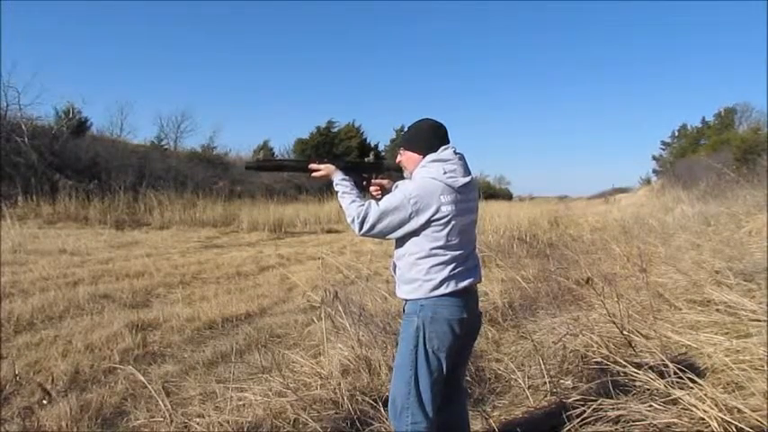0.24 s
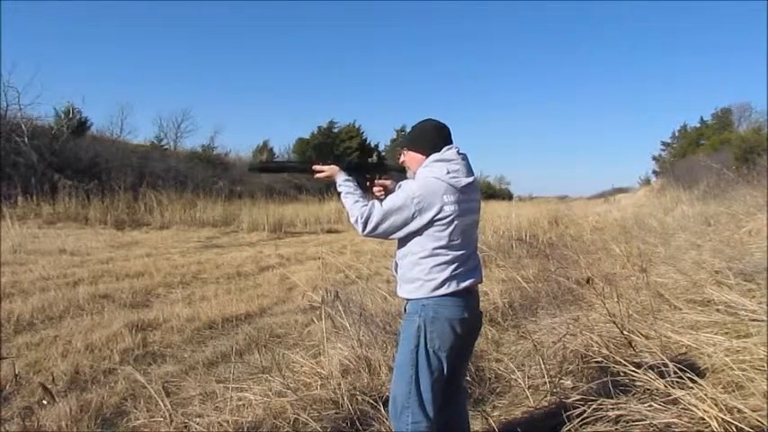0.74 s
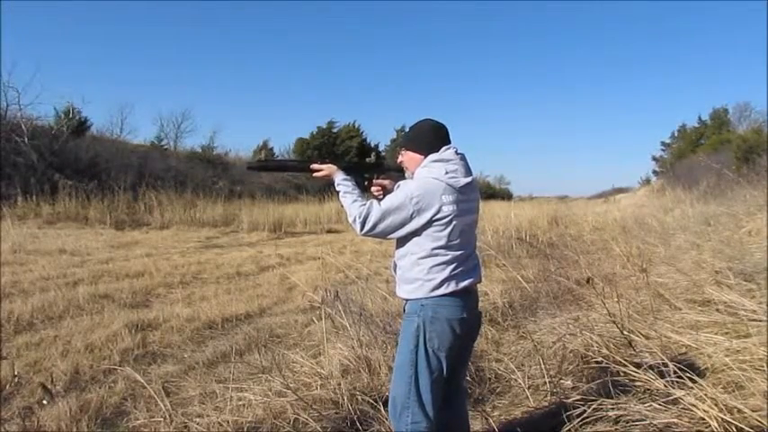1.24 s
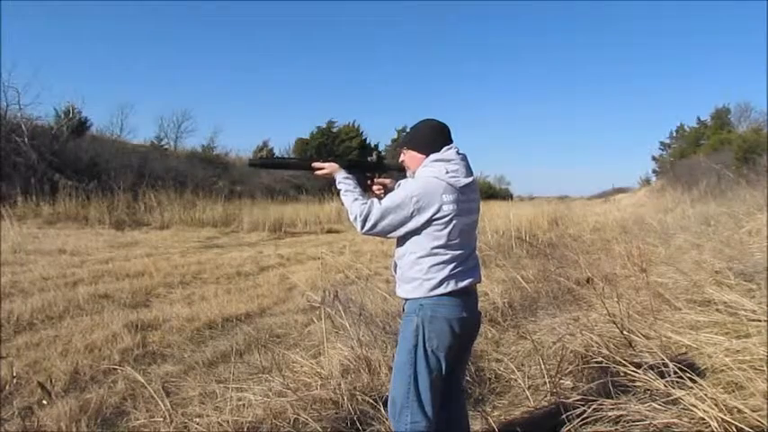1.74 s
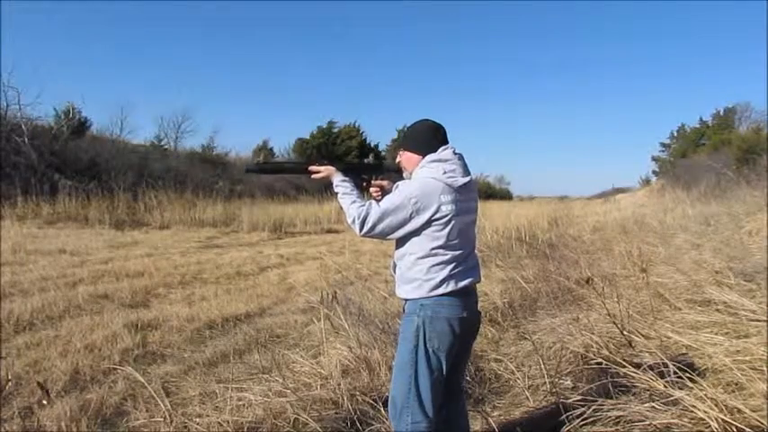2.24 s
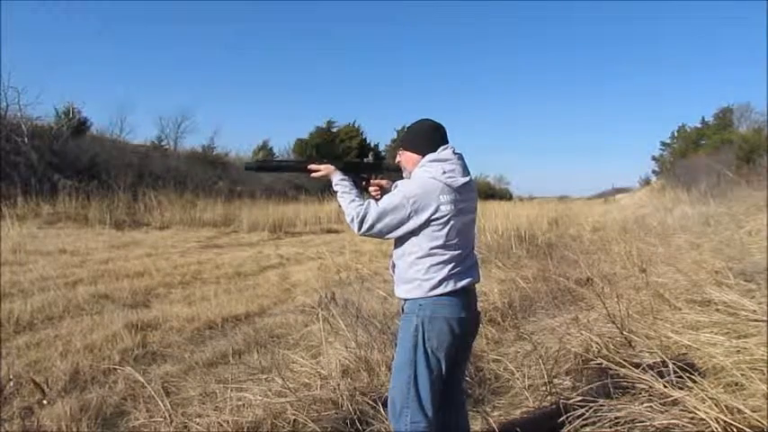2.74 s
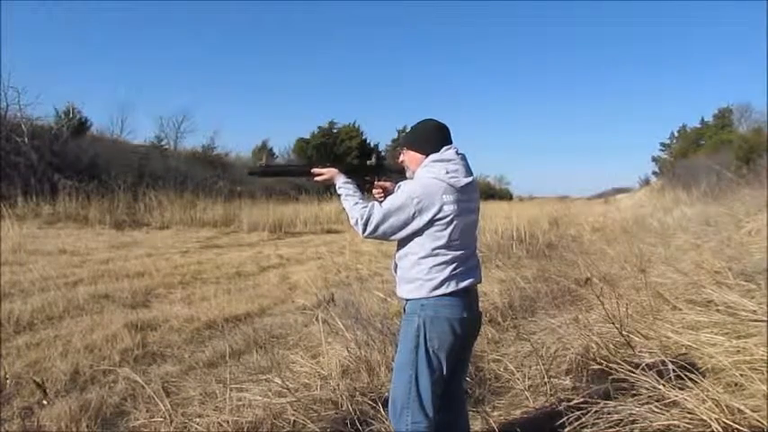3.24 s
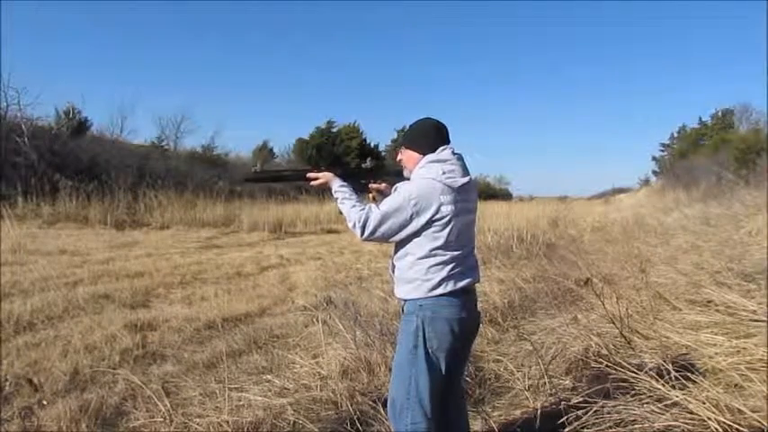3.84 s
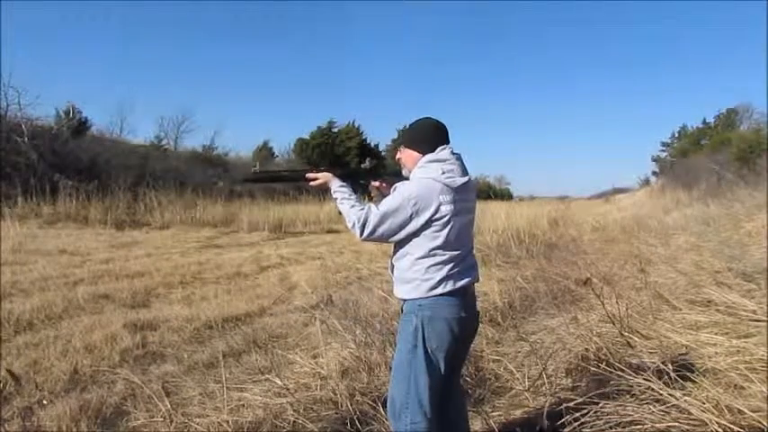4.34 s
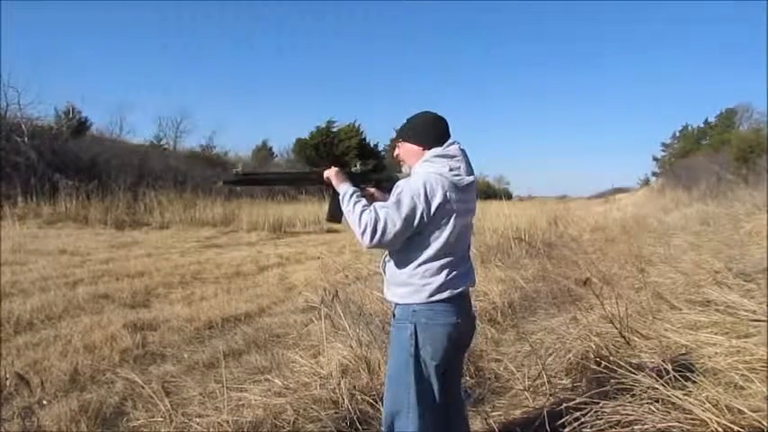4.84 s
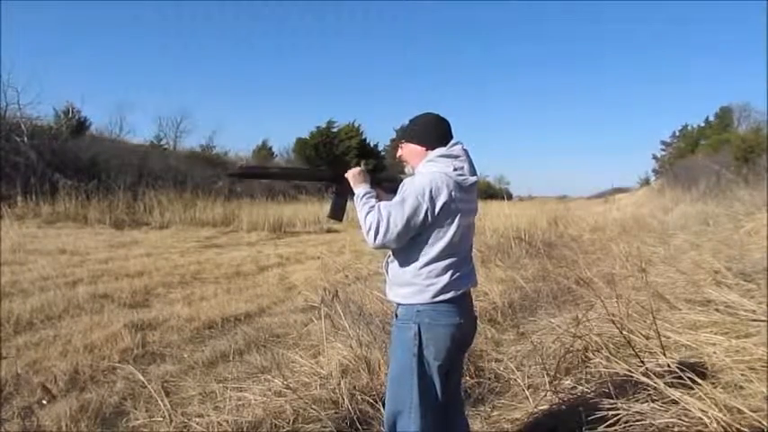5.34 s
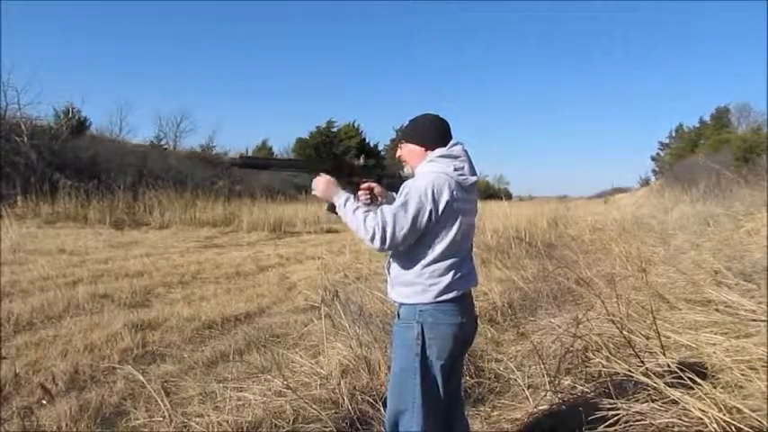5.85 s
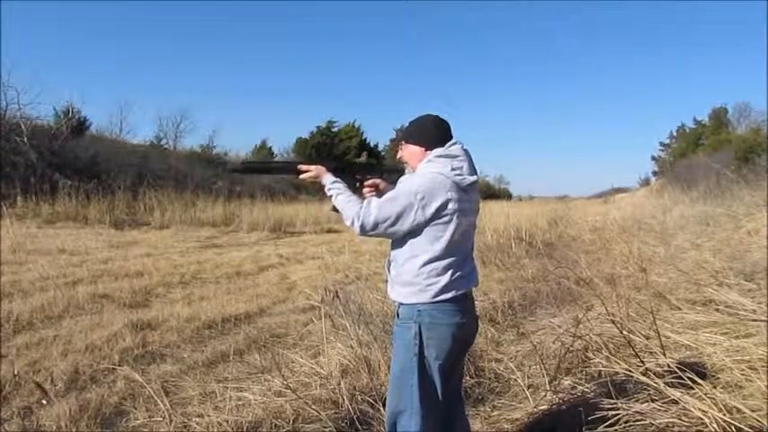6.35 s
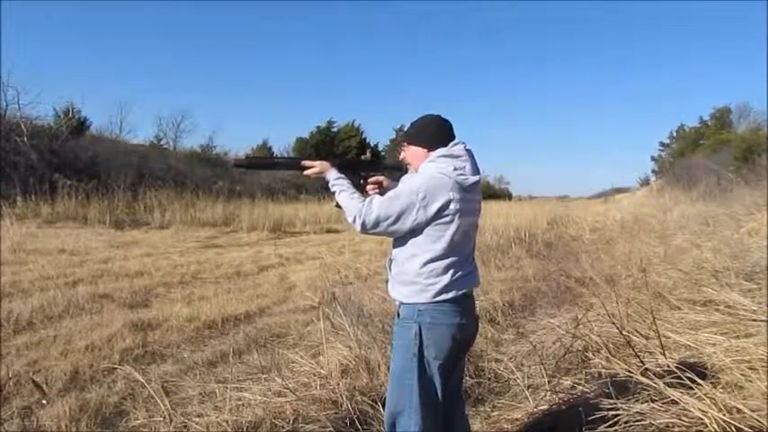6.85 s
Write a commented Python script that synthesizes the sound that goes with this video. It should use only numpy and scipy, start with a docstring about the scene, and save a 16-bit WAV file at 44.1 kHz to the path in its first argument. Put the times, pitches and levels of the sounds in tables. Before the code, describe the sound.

A suppressed rifle fires three single shots in a windy field, then its steel bolt is worked by hand amid rumbling gusts.

```python
"""In a windy field, a suppressed rifle fires three single shots. Each is a pop and a hiss of gas that
a line of brush on the left scatters back. The shooter then works the bolt by hand: steel slides,
clacks and rings. Swirls of wind push on the two microphone ports, mostly the right one,
over the far hush of the field and the rustle of dry grass."""
import sys
import numpy as np
from scipy import signal
from scipy.fft import rfft, irfft, next_fast_len
from scipy.io import wavfile
from scipy.ndimage import uniform_filter1d

SR = 44100
rng = np.random.default_rng(int(sys.argv[2]) if len(sys.argv) > 2 else 0)


def wrap_up_sound(samples):
    """Save the sound to the file named by the first command line argument, as 16-bit audio."""
    columns = np.atleast_2d(samples).T
    # keep every value between -1 and 1, then stretch to whole-number steps
    tamed = np.clip(columns, -1, 1)
    steps = np.round(tamed * 32767).astype(np.int16)
    wavfile.write(sys.argv[1], SR, steps)


N = 313538


def amp(db):
    return 10 ** (np.asarray(db) / 20)


def rms_one(x):
    return x / np.sqrt(np.mean(x ** 2) + 1e-20)


def in_time(rows):
    """Join a table's rows with straight lines in time."""
    s, *columns = np.transpose(rows)
    return [np.interp(np.arange(N) / SR, s, c) for c in columns]


def at_hz(rows, hz):
    """Read a table between its rows at any pitch."""
    pitches, *columns = np.transpose(rows)
    return [np.interp(np.log(hz), np.log(pitches), c) for c in columns]


def drift(rate):
    """A slow random wobble, about 1 in size."""
    r = np.exp(-80 * np.pi * rate / SR)
    slow = signal.lfilter([1], [1, -2 * r, r * r], rng.standard_normal(N // 40 + 2002))[2000:]
    return np.interp(np.arange(N) / 40, np.arange(len(slow)), rms_one(slow))


def swell(peak_s, db, rise_s, fall_s):
    """A level that climbs 20 dB in rise_s to its peak, then sinks 20 dB in fall_s."""
    t = np.arange(N) / SR - peak_s
    return amp(db) * np.exp(-np.log(10) * np.abs(t) / np.where(t < 0, rise_s, fall_s))


def ring(clicks, hz, fade_s):
    """Each click starts a tone. Here and below, fade_s is the time to fade by 60 dB."""
    r, w = amp(-60 / (fade_s * SR)), 2 * np.pi * hz / SR
    return signal.lfilter([0, np.sin(w)], [1, -2 * r * np.cos(w), r * r], clicks + 1e-18)


def bands(size, likeness, lowest_hz):
    """Stereo noise, one band of pitch at a time; likeness sets how alike left and right are."""
    edges = np.r_[40 * 2 ** np.arange(0, 6, .5), 2560 * 2 ** np.arange(0, 2.9, .3)]
    edges = edges[edges >= lowest_hz]
    white = rng.standard_normal((2, 2, size))
    for k, (low, high) in enumerate(zip(edges, edges[1:])):
        band = signal.butter(2, [low, high], "band", fs=SR, output="sos")
        mid, side = signal.sosfilt(band, white[k % 2])
        hz = np.sqrt(low * high)
        alike = np.clip(likeness(hz), -.95, .95)
        yield hz, np.sqrt(1 + alike) * mid + np.sqrt(1 - alike) * side * [[1], [-1]]


def add(out, start_s, x):
    i = round(start_s * SR)
    out[..., i:i + x.shape[-1]] += x[..., :N - i]


def wave(size_hz):
    """One push and pull of air; a higher size_hz makes it shorter."""
    t = np.arange(round(2 * SR / size_hz)) * size_hz / SR - 1
    return -2.3 * t / .3 * np.exp(-(t / .3) ** 2)


# Background level: hush and rustle jump up, dip after the last clack, then slowly recover.
# Columns: time_s, hush_db, rustle_db
BACKGROUND_LEVELS = [(0, -52.5, -63.5), (.47, -52.5, -62.5), (.9, -57, -70.5), (1.2, -53, -67),
                     (1.6, -52.5, -64.5), (2.05, -52.5, -69.5), (2.44, -55.5, -62.5), (2.87, -53, -61),
                     (3.3, -56.5, -67), (3.5, -52.5, -60.5), (4.15, -52, -57.5), (4.165, -38.5, -48.5),
                     (4.5, -37.5, -45), (4.95, -37, -46), (5.3, -41.5, -49), (5.663, -45, -51),
                     (5.675, -64.5, -55), (5.82, -59.5, -69), (6.02, -56, -66), (6.3, -51.5, -56.5),
                     (6.8, -43.5, -45.5), (6.88, -42, -38.5), (6.97, -45, -46), (7.11, -43, -48)]
# Tone of the far hush: pitch_hz, level_db
HUSH_TONE = [(40, 0.5), (90, 3.5), (170, -7.5), (300, -0.5), (700, -7), (1600, -10), (3000, -13.5),
             (5000, -18.5), (9000, -39.5), (16000, -44)]
# Tone of the dry grass: pitch_hz, level_db
RUSTLE_TONE = [(2500, -20.5), (5000, -4.5), (8000, 3.5), (11500, 4.5), (13500, -2), (16000, -20)]
# How alike left and right sound: pitch_hz, likeness (below 0 is opposite)
STEREO_LIKENESS = [(60, 0.34), (180, -1.3), (550, 1), (1650, 0.44), (4970, -0.43), (15000, -0.21)]
def field():
    """A far hush and wind in dry grass, each band wavering a little."""
    hush_db, rustle_db = in_time(BACKGROUND_LEVELS)
    hush, rustle, waver = 0, 0, drift(3.5)
    for hz, noise in bands(N, lambda hz: at_hz(STEREO_LIKENESS, hz)[0], lowest_hz=40):
        noise = noise * amp(1.4 * drift(5.1))
        hush = hush + amp(at_hz(HUSH_TONE, hz)[0]) * noise
        rustle = rustle + amp(at_hz(RUSTLE_TONE, hz)[0]) * noise[::-1]
    lean_left = amp([[.6], [-.6]])
    stirred = np.hypot(amp(rustle_db + 0.4 * waver), falling_cases())
    return lean_left * (amp(hush_db) * rms_one(hush) + stirred * rms_one(rustle))


def swirls(sizes, per_cycle, spread_db):
    """Lumps of air sweep past one port at random, each a single wave."""
    out = 0
    for hz, db in sizes:
        passing = (rng.random(N) < per_cycle * hz / SR) * rng.choice([-1, 1], N)
        passing = passing * amp(spread_db * np.minimum(rng.exponential(1, N), 4))
        out = out + amp(db) * rms_one(signal.oaconvolve(passing, wave(hz / 1.491))[:N])
    return rms_one(out)


# Steady wind: time_s, rumble_db, small_swirls_db, left_minus_right_db
STEADY_WIND = [(0, -46, -24, -33), (.3, -41, -26, -16), (.46, -52.5, -9, -9.5), (.7, -65.5, 1.5, 6),
               (.97, -67, 0, 6), (1.02, -56, -32, -15), (1.45, -54, -13.5, -2.5), (1.98, -54.5, -25.5, -2),
               (2.01, -36.5, -20.5, -22), (2.68, -28, -16.5, -8.5), (2.8, -40, -21, 0.5),
               (3.2, -47.5, -8.5, 1.5), (3.33, -37, -2, -3), (3.58, -41.5, -31, 6),
               (3.92, -40.5, -41.5, 5.5), (4.3, -29.5, -10.5, -4), (4.8, -31, -13.5, 5),
               (5.1, -34, -25.5, -1), (5.6, -42, -12.5, -6.5), (5.73, -66.5, -3.5, 4),
               (6.0, -54.5, -9.5, -6), (6.34, -60, -3, 0), (6.38, -41, -15.5, -14), (6.75, -36, -11, 8),
               (7.03, -56, -4, 3), (7.11, -32.5, -22, -1)]
# Gusts on top: peak_s, rumble_db, rise_s, fall_s, small_swirls_db, left_minus_right_db
WIND_GUSTS = [(.17, -35.5, 0.067, 0.042, -41, -25), (1.51, -40.5, 0.027, 0.14, -22, -19),
              (1.6, -45.5, 0.026, 0.34, -23, -8), (1.834, -42, 0.22, 0.1, -22, -21.5),
              (2.068, -39, 0.087, 0.13, -19, -17), (2.452, -27, 0.081, 0.35, -16.5, -15.5),
              (2.695, -28, 0.1, 0.077, 0, -8.5), (2.865, -27.5, 0.049, 0.083, -10, -11.5),
              (3.52, -35.5, 0.37, .04, -22, -9.5), (3.78, -29.5, 0.23, 0.17, -6.5, 1),
              (4.05, -33.5, 0.12, 0.034, -2.5, -7), (4.189, -20.5, 0.14, 0.14, -2, -11),
              (4.52, -28.5, 0.2, 0.063, -26, -10), (4.81, -26, .1, .1, -44.5, -32),
              (4.999, -19, 0.19, 0.061, -5.5, -14.5), (5.27, -24, 0.19, 0.22, -13, -15.5),
              (6.57, -39, 0.35, .1, -17.5, 0), (6.635, -25, 0.078, 0.055, -7, 0.5),
              (6.811, -20, 0.017, 0.18, -7.5, -11), (6.891, -15, 0.1, 0.09, -6, -12),
              (6.975, -27, 0.26, 0.024, -14.5, -1)]
# Big swirls of air: size_hz, level_db
BIG_SWIRLS = [(45, -9.5), (70, -2), (100, -11), (160, 2), (240, -0.5), (380, -4)]
def wind():
    """Each port gets its own swirls; small ones ride on the strongest big ones."""
    rumble_db, small_db, pan_db = in_time(STEADY_WIND)
    layers = [(amp(rumble_db), small_db, pan_db)] + [(swell(*row[:4]), *row[4:]) for row in WIND_GUSTS]
    power = sum(gain ** 2 for gain, _, _ in layers)
    # The loudest gust has the most say in tone and side.
    small_db, pan_db = (sum(row[0] ** 2 * row[k] for row in layers) / power for k in (1, 2))
    right = 2 * np.sqrt(power / (1 + amp(2 * pan_db)))
    out = np.zeros((2, N))
    for port, level in enumerate((right * amp(pan_db), right)):
        big = swirls(BIG_SWIRLS, per_cycle=1.3, spread_db=4.5)
        lumps = uniform_filter1d(big ** 2, size=300)
        small = swirls([(500, 4.5), (800, -3), (1300, -14.5), (2100, -24.5)], per_cycle=.6, spread_db=3.5)
        if port == 0:   # the sheltered left port gets rounder lumps
            big = rms_one(signal.lfilter([1], [1, -.975], big))
        pressure = big + amp(small_db + (-6, 4)[port]) * rms_one(small * lumps ** 0.68)
        limited = 2.73 * np.tanh(pressure / 2.34)   # no lump grows far beyond its gust
        out[port] = level * amp(1.4 * drift(34.0)) * limited
    return signal.sosfilt(signal.butter(2, 50, "high", fs=SR, output="sos"), out + buffets())


# Notes of the rifle's steel body: pitch_hz, level_db, fade_s
BODY_NOTES = [(2300, -10, 0.0095), (2960, -12.5, 0.0057), (4150, -10.5, 0.018), (4830, -18.5, 0.028),
              (5750, -5.5, 0.0052), (6430, -15.5, 0.038), (7430, -7.5, .035), (8764, -11, 0.019),
              (9800, -9, 0.014), (9560, 1, 0.011), (11200, -12, 0.028), (14300, -19.5, .03)]
def body_ring(hits, slide):
    """Knocks and gritty sliding set the steel body ringing."""
    start_s, db, _, _ = np.transpose(hits)
    at, out = np.round(start_s * SR).astype(int), np.zeros(N)
    grit = amp(4 * np.minimum(rng.exponential(1, N), 4)) * rng.choice([-1, 1], N)
    grit *= rng.random(N) < 3000 / SR   # about 3000 tiny catches a second
    for hz, note_db, fade_s in BODY_NOTES:
        clicks = slide * rms_one(grit) * amp(note_db - 26.5)
        strength = amp(db - 10 + note_db + rng.normal(0, 3.0, len(at)))
        clicks[at] += strength * rng.choice([-1, 1], len(at))
        out += ring(clicks, hz, fade_s)
    return out


# Tone of steel meeting steel: pitch_hz, level_db
CRACK_TONE = [(500, -49), (1200, -16.5), (2000, -11.5), (2700, -9), (3500, -12.5), (4500, -9.5),
              (5800, -5.5), (8000, -3.5), (10000, -4), (12600, -9.5), (16000, -25.5)]
def cracks_and_scrapes(hits, slide):
    """Each knock gives a snap of noise with a faint rattle; sliding gives a hiss."""
    t, snaps = np.arange(round(.08 * SR)) / SR, np.zeros((2, N))   # rows: below and above 4 kHz
    for start_s, db, low_db, fade_s in hits:
        fading = amp(-60 * t / fade_s) + .1 * amp(-60 * t / (3 * fade_s))
        add(snaps, start_s, amp([[db + low_db - 10.5], [db - 4.5]]) * fading * np.minimum(t / .0002, 1))
    size = next_fast_len(N)
    hz = np.fft.rfftfreq(size, 1 / SR) + 1
    mid, side = rfft(rng.standard_normal((2, size))) * amp(at_hz(CRACK_TONE, hz)[0])
    stereo = mid + 0.2 * side * [[1], [-1]]
    low, high = (rms_one(irfft(stereo * part, size)[:, :N]) for part in (hz < 4000, hz >= 4000))
    return low * np.hypot(snaps[0], amp(-11.5) * slide) + high * np.hypot(snaps[1], slide)


# The bolt knocks, after a shot or by hand: start_s, level_db, low_part_db, fade_s
BOLT_CLACKS = [(.5596, -18, -20, 0.0065), (.5686, -12, -24, 0.017), (.573, -15, -3, 0.016),
               (1.076, -64, 24, .04), (1.6928, -23, -25, 0.014), (1.708, -17, -17, 0.017),
               (2.958, -19.5, -19.5, .012), (2.9725, -11.5, -17, 0.02), (2.9765, -14, -19, .012),
               (2.988, -20, -19, .012), (3.05, -23, 6, .012), (3.071, -29, 7.5, .012),
               (4.401, -27.5, -23, 0.028), (4.9642, -26, -1, 0.028), (5.001, -19, 0, 0.042),
               (5.0152, -16.5, -1.5, 0.027), (5.0184, -14.5, -0.5, 0.036), (5.0428, -26, 1, 0.03),
               (5.0573, -4, 0, 0.026), (5.0632, -13, -33.5, 0.025), (5.1048, -18, 1, 0.029),
               (5.3903, 2, -5, 0.0082), (5.4012, -21, 5, 0.021), (5.5927, -8.5, -7.5, 0.017),
               (5.6068, -6, -1.5, 0.0071), (5.6197, -4.5, -15, 0.014), (5.6235, 0.5, -19, 0.013)]
# The bolt slides in its rails: peak_s, level_db, rise_s, fall_s
BOLT_SLIDES = [(5.002, -30, .001, 0.036), (5.055, -34, .035, .03), (5.108, -30, 0.028, 0.041),
               (5.375, -35.5, .05, .05), (5.4, -25.5, 0.024, .025), (5.602, -16, 0.021, 0.034),
               (5.65, -53, 0.055, .08), (5.715, -57.5, .2, 0.012)]
def steel_parts():
    """The hammer, the muzzle's crack and the moving bolt make the rifle ring and snap."""
    hits = list(BOLT_CLACKS)
    for start_s, *_ in RIFLE_SHOTS:
        hits.append((start_s - .0067, -12, -14, .007))   # hammer
        hits.append((start_s + .0002, 0, -6, .01))   # muzzle crack
    slide = sum(swell(*row) for row in BOLT_SLIDES)
    return body_ring(hits, slide) + cracks_and_scrapes(hits, slide)


# The shots: start_s, blast_db, echo_db, echo_bass_db, echo_stretch (times), echo_end_drop_db
RIFLE_SHOTS = [(.4930, -9.5, -15, 1, 1.32, -10), (1.6282, -9.5, -14, 10, 0.87, -2.5),
               (2.8927, -9.5, -19, 5.5, 1.6, -17)]
# The pop coming back off tree trunks: size_hz, level_db (added to the shot's echo)
TRUNK_ECHO = [(280, -25), (830, -13)]
def muzzle_pops():
    """Each shot shoves the air with a thump and a pop, and the trunks send it back."""
    out, trunk_delay_s = np.zeros((2, N)), .0955
    pop = np.abs(wave(582))
    pop[len(pop) // 2 + 1:] *= -.35   # hard pull, soft return
    for start_s, _, echo_db, bass_db, _, _ in RIFLE_SHOTS:
        add(out, start_s - .002, -amp(-20.5) * wave(123))   # thump
        add(out, start_s + .0002, -amp(-10.5) * pop)
        for hz, db in TRUNK_ECHO:
            add(out, start_s + trunk_delay_s - 1 / hz, amp(echo_db + bass_db + db) * wave(hz))
    return out


# Gas rushing from the muzzle: pitch_hz, level_db, hold_s, fade_s
GAS_JET = [(60, -0.5, .01, .15), (150, -2, .002, 0.17), (590, -1, 0.0022, 0.083),
           (1697, -5.5, 0.0053, 0.11), (4500, -5, 0.026, 0.12), (9660, 2, 0.014, 0.093),
           (13130, -5.5, 0.024, .12), (16000, -13, 0.018, .11)]
# Scatter off the grass all round: pitch_hz, level_db, base_length_s
GRASS_ECHO = [(150, -39, 0.14), (600, -30, 0.1), (1700, -26.5, 0.15), (4500, -14.5, .12), (10140, -15, 0.1),
              (13000, -18.5, 0.13), (16000, -31.5, .075)]
# Echo off far trees: pitch_hz, level_db, fade_s
TREE_ECHO = [(150, -62, .8), (1000, -39, .9), (3000, -25, 0.98), (7000, -23, 0.89), (11150, -39.5, .45),
             (16000, -57.5, .35)]
# Echo off the brush, twigs first, trunks later: pitch_hz, level_db, delay_s, base_fade_s
BRUSH_ECHO = [(150, -48, 0.078, 0.17), (596, -14, 0.1014, 0.24), (1680, -10.5, 0.086, 0.28),
              (4150, -1, 0.084, 0.33), (10050, 0, 0.071, 0.15), (13160, -3, 0.08, 0.11),
              (16000, -28, 0.063, .14)]
def gas_and_echoes():
    """Gas hisses out of the muzzle; grass, far trees and brush scatter the sound back."""
    out, t = np.zeros((2, N)), np.arange(round(.7 * SR)) / SR
    for start_s, blast_db, echo_db, bass_db, stretch, drop_db in RIFLE_SHOTS:
        for hz, noise in bands(len(t), lambda hz: at_hz(STEREO_LIKENESS, hz)[0] + 0.15, lowest_hz=50):
            db, hold_s, fade_s = at_hz(GAS_JET, hz)
            jet = amp(db - 60 * np.maximum(t - hold_s, 0) / fade_s) * (1 + 0.2 * np.exp(-t / 0.0005))
            db, length_s = at_hz(GRASS_ECHO, hz)
            grass = amp(db + 4.5) * np.exp(-(t / (1.098 * length_s)) ** 2)
            db, fade_s = at_hz(TREE_ECHO, hz)
            trees = amp(db - 60 * t / fade_s)
            db, delay_s, fade_s = at_hz(BRUSH_ECHO, hz)
            age = t - delay_s
            begins = .5 + .5 * np.tanh(age / 0.002)
            ends = amp(drop_db * (.5 + .5 * np.tanh((t - .188) / 0.0057)))   # the brush line ends
            brush = amp(db + bass_db / (1 + (hz / 5000) ** 2) - 60 * age / (stretch * fade_s))
            from_left = amp(echo_db) * brush * begins * ends * amp([[3.5], [-4.5]])
            around = amp(blast_db) * np.sqrt(jet ** 2 * amp([[1.2], [-1.2]]) + grass ** 2 + trees ** 2)
            add(out, start_s, noise * np.hypot(around, from_left) * np.minimum(t / .0004, 1))
    return out


# Spent cases land: peak_s, level_db, rise_s, fall_s
CASE_DROPS = [(1.237, -53, .01, 0.083), (2.449, -53.5, .003, .02), (2.489, -54, .003, .02)]
def falling_cases():
    """How much the grass rustles as spent cases drop into it."""
    return sum(swell(*row) for row in CASE_DROPS)


# Sudden slaps of wind: time_s, level_db, size_hz, edge_db, left_minus_right_db
WIND_SLAPS = [(2.05, -27, 127, -43.5, -15), (2.205, -22.5, 179, -37.5, -21), (2.46, -17, 202, -40, -31),
              (2.596, -23, 222, -25, -27), (2.69, -23.5, 136, -29, -13), (2.852, -18, 155.4, -29.5, -11),
              (3.335, -23.5, 218, -38.5, -11.5), (3.382, -25.5, 200, -41, -9.5),
              (3.517, -23.5, 265, -37.5, -13.5), (3.804, -20.5, 180, -38, -7.5),
              (4.019, -18, 139, -38.5, -16), (4.11, -10.5, 137, -26.5, -9), (4.154, -25, 170, -21.5, -21),
              (4.192, -7.5, 131, -15, -15), (4.225, -24, 160, -20, -16), (4.931, -9.5, 142, -18.5, -14),
              (4.97, -13, 250, -22.5, -8), (5.246, -14, 122.4, -44, -16.5), (6.46, -25, 122, -35.5, -18),
              (6.622, -26, 260, -36, -4), (6.645, -19.5, 170, -45, 7), (6.794, -20, 124, -50, -12.5),
              (6.848, -8, 138, -30, -27), (6.901, -23, 155, -26, -23.5)]
def buffets():
    """One lump of air hits the ports and breaks with a sharp edge."""
    out = np.zeros((2, N))
    for time_s, db, hz, edge_db, left_db in WIND_SLAPS:
        ports = amp([[min(left_db, 0)], [min(-left_db, 0)]])
        add(out, time_s - .5 / hz, ports * amp(db + 2.0) * wave(hz))
        add(out, time_s, ports * amp([[-12], [0]]) * amp(edge_db + 5.5) * wave(890))
    return out


# Notes of the bolt's spring: pitch_hz, level_db, fade_s
SPRING_NOTES = [(4027, -24, .08), (7230, -40, .14), (9507, -34, .24), (12550, -36, .08)]
def spring_ring():
    """The bolt flies home on the last clack and sets its spring ringing."""
    click = np.arange(N) == round(BOLT_CLACKS[-1][0] * SR)
    return sum(ring(click * amp(db), hz, fade_s) for hz, db, fade_s in SPRING_NOTES)


def scene():
    rifle = muzzle_pops() + gas_and_echoes() + steel_parts() + spring_ring()
    return rifle + field() + wind()


def record(dry):
    """The loudest peaks flatten and the highest treble is cut."""
    squashed = dry / (1 + np.abs(dry) ** 6) ** (1 / 6)
    return signal.sosfilt(signal.cheby2(18, 85, 16700, fs=SR, output="sos"), squashed)


dry = scene()
out = record(dry)
wrap_up_sound(out)
```